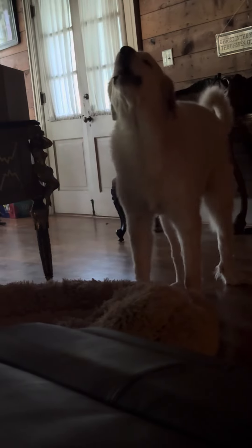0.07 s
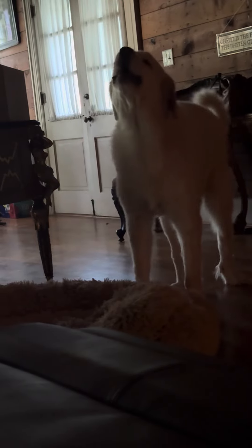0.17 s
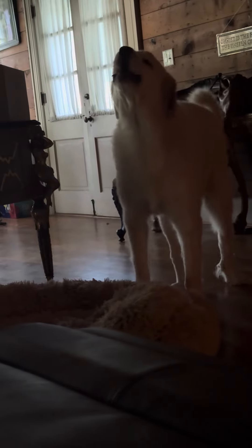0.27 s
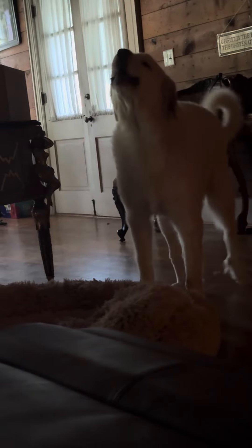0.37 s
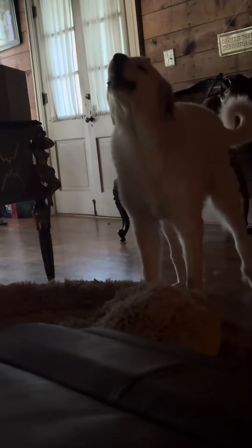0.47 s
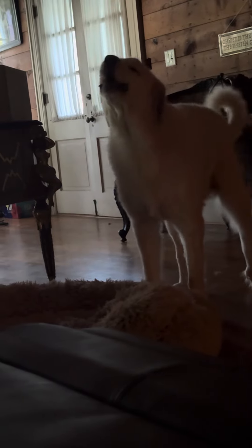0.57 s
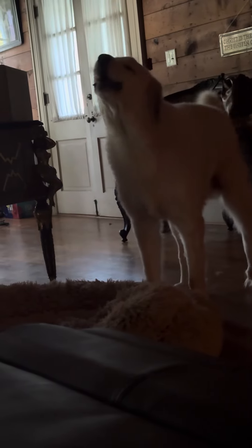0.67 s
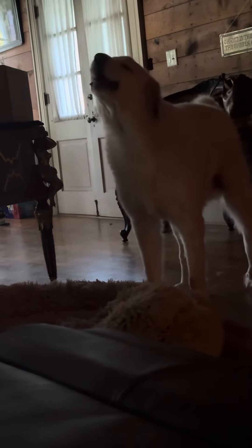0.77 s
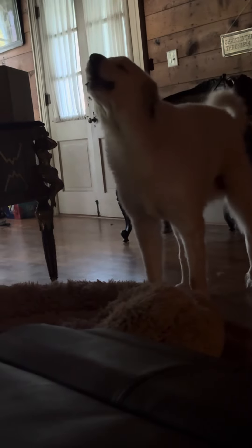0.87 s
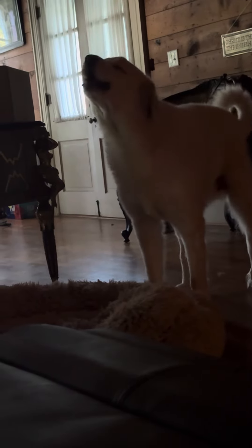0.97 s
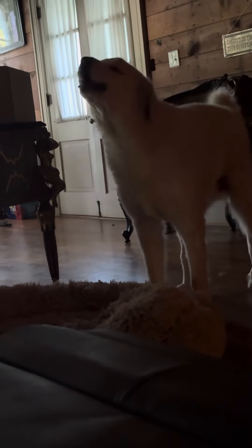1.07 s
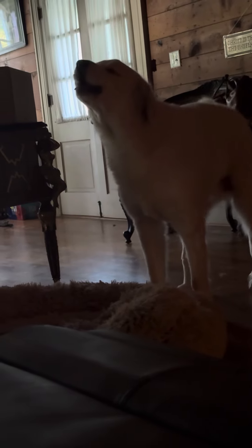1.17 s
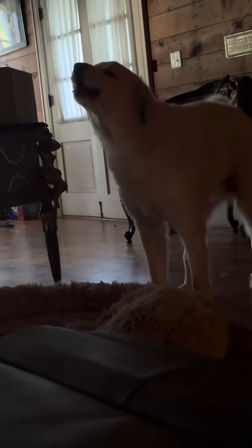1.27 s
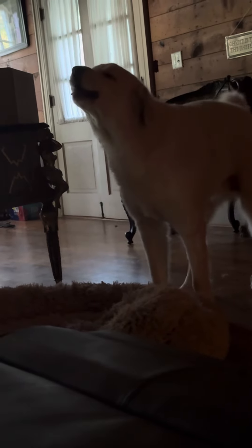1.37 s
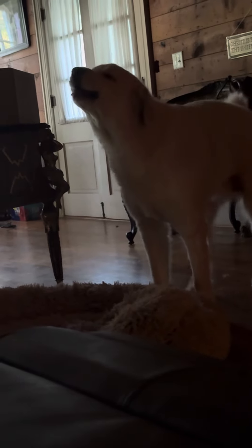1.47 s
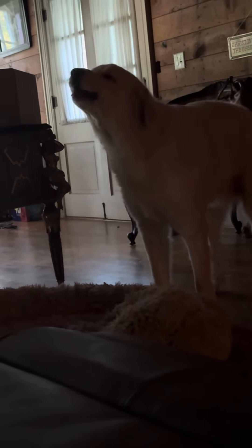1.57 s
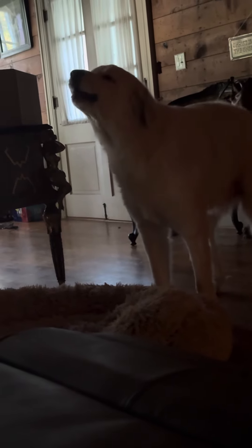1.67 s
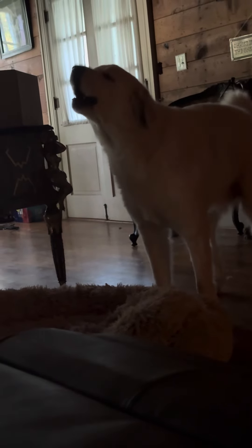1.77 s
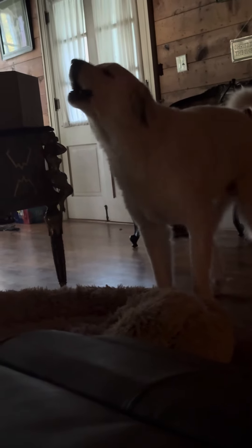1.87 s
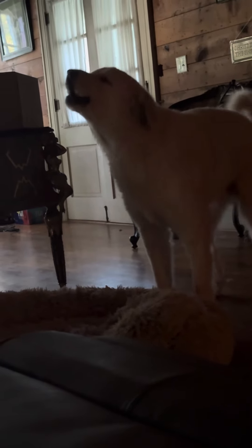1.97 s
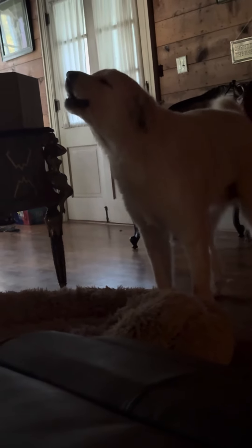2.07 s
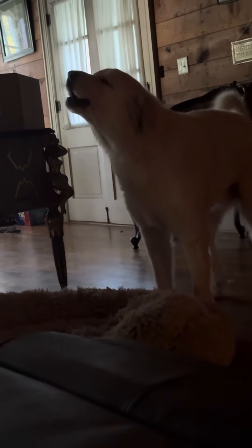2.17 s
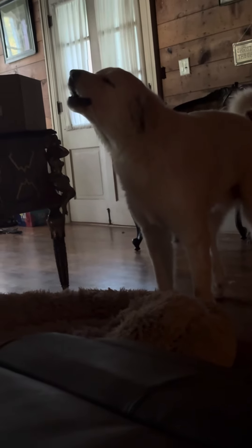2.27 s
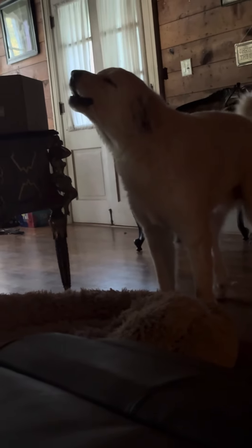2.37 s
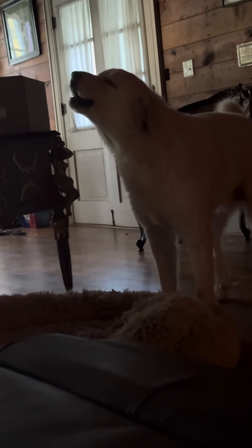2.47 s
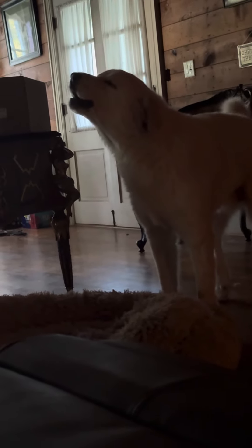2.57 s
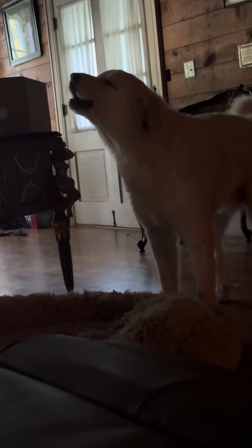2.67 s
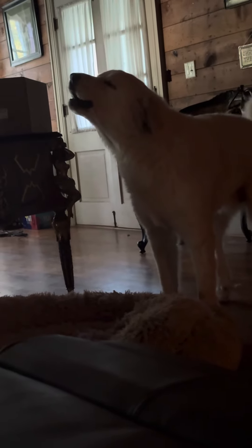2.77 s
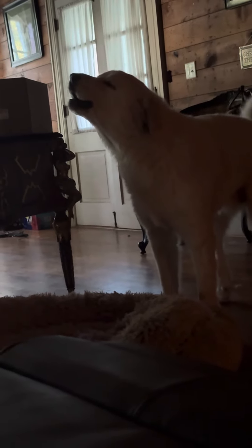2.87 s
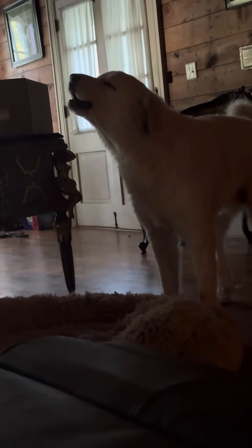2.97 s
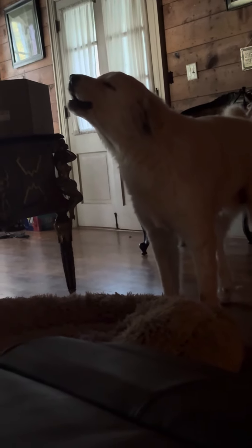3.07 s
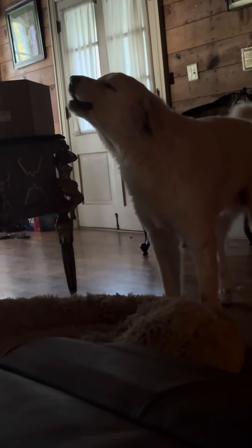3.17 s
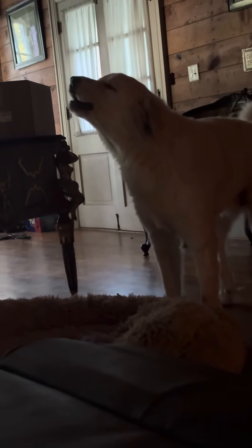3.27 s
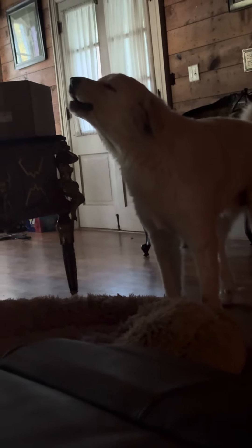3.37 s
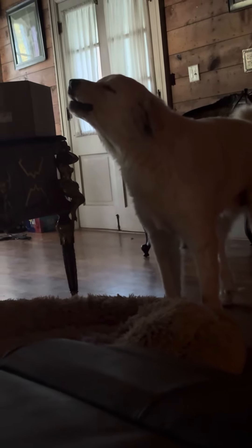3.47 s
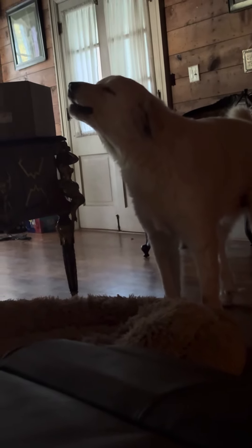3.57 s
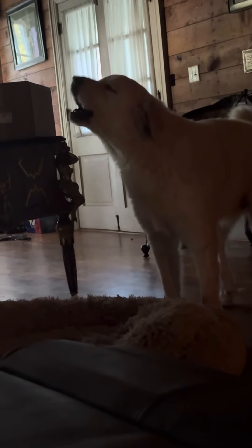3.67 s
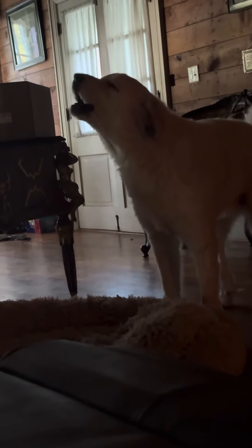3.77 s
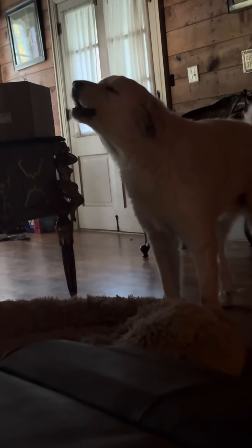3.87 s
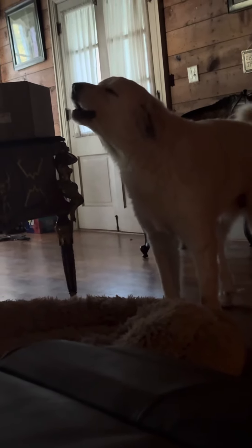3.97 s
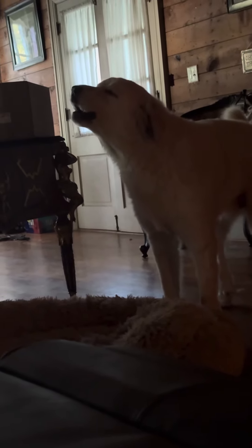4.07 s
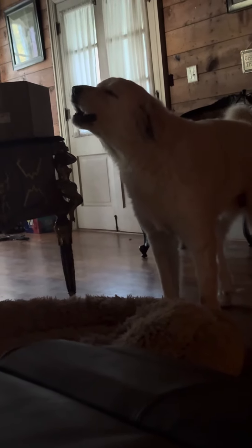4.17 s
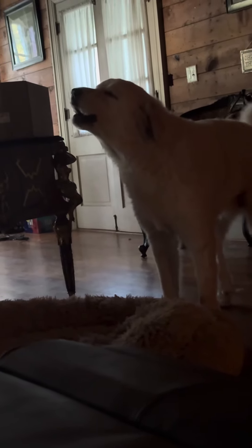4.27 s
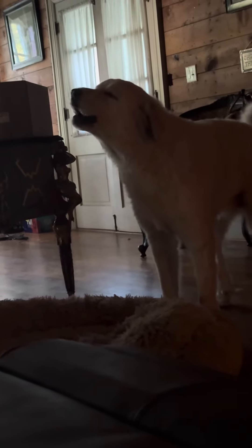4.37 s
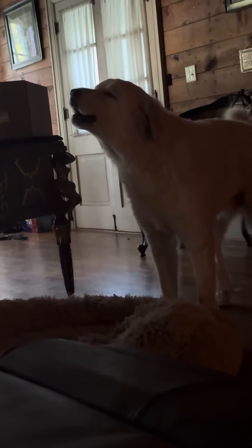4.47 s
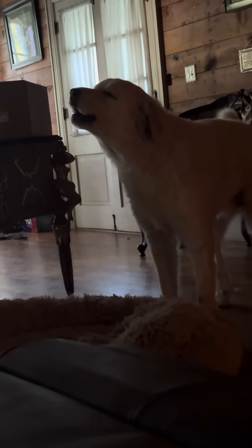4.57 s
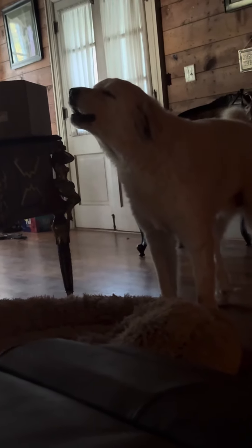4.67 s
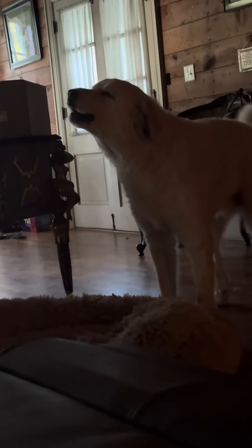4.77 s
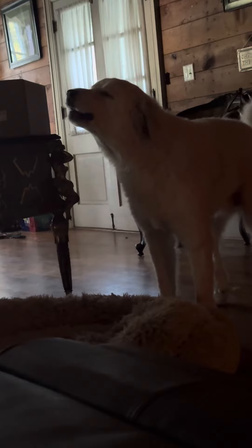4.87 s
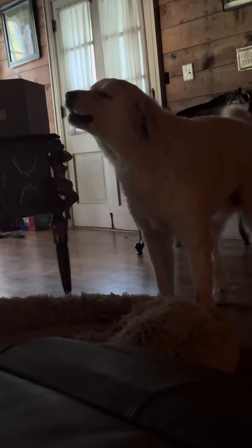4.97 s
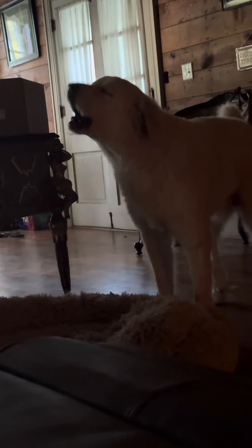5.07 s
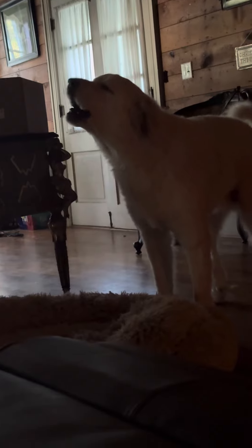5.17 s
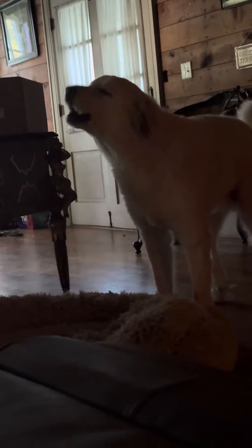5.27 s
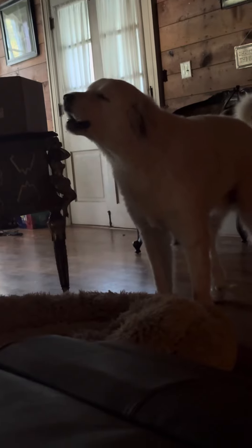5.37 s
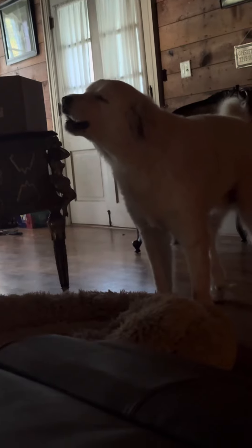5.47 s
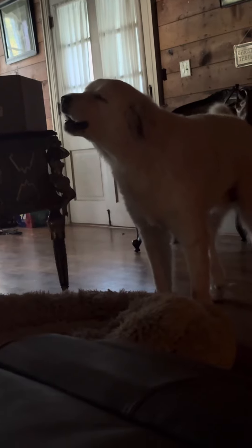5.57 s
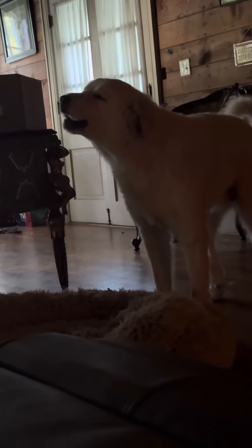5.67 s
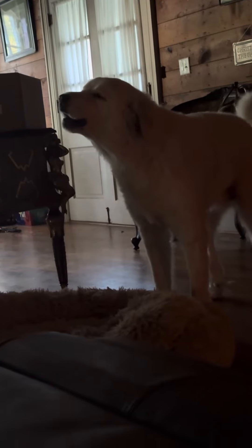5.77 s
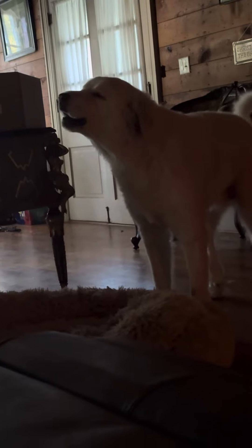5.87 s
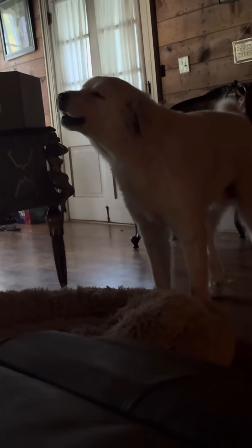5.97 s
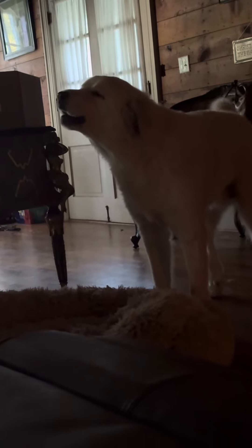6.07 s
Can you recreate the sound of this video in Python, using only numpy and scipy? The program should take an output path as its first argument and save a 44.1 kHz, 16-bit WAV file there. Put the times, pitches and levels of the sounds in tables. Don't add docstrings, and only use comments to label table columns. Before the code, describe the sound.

A large dog howls in a wood-panelled living room, heard by a phone a few metres away. At 0 s a high yelp already under way drops to a short low note, then at 0.1 s leaps to a long high howl, wavering and gradually sinking until it falls off near 1.45 s. Small dry claw ticks land on the boards at about 1.6 s. The second howl starts high at 1.8 s, drops low at 1.9, flips up at 2.45 and holds until a quick fall at 3.4. The third opens higher at 3.65, dips at 3.8, rises at 4.1 and ends low by 4.9. The fourth starts highest at 5.1, holds low from 5.2, then flips up just before 6 s and is cut off. The tone is smooth and nearly pure, briefly rough at the breaks. A short room ring, faint low hum and soft hiss lie beneath.

```python
import sys
import numpy as np
from scipy import signal
from scipy.fft import rfft, irfft
from scipy.io import wavfile
from scipy.ndimage import uniform_filter1d

SR = 44100
rng = np.random.default_rng(int(sys.argv[2]) if len(sys.argv) > 2 else 0)


def store_wav(level_fs):
    pcm = np.round(np.clip(np.atleast_2d(level_fs), -1, 1) * 32767)
    wavfile.write(sys.argv[1], SR, pcm.T.astype(np.int16))


def magnitude_from_level(level_db):
    exponent = np.asarray(level_db, float) / 20
    return 10 ** exponent


N = 269451
LEAD = 8000


def at_hz(points, hz):
    table_hz, values = np.transpose(points)
    return np.interp(np.log(hz), np.log(table_hz), values)


def drift(size, rate):
    knots = rng.standard_normal(400)
    return np.interp(np.arange(size) * rate / SR, np.arange(400), knots)


def coloured(spectrum, size):
    hz = np.maximum(np.arange(size // 2 + 1) * SR / size, 1)
    noise = irfft(rfft(rng.standard_normal(size)) * magnitude_from_level(at_hz(spectrum, hz)), size)
    return noise / np.std(noise)


def hum():
    # (frequency [Hz], level [dB per Hz])
    hum_spectrum = [(15, -44), (25, -7.5), (59, 1.5), (113, 5), (206, -9.5), (227, -9), (240, -0.5),
                    (310, -36.5), (530, -120)]
    mid = magnitude_from_level(-60) * coloured(hum_spectrum, size=N)
    side = magnitude_from_level(-83) * coloured(hum_spectrum, size=N)
    return np.array([mid, side])


def air():
    # (frequency [Hz], level [dB per Hz])
    air_spectrum = [(140, -21.5), (240, -16), (563, -6), (1360, -24.5), (1730, -7), (2160, -38.5),
                    (2630, -19.5), (8570, -26.5), (11100, -76.5), (18900, -120)]
    mid = magnitude_from_level(-73) * coloured(air_spectrum, size=N)
    side = magnitude_from_level(-84) * coloured(air_spectrum, size=N)
    return np.array([mid, side])


def room(x):
    # (frequency [Hz], time to fall 60 dB [s])
    decay_times = [(200, 0.53), (500, 0.47), (1500, 0.52), (4000, .35), (9000, 0.27)]
    t = np.arange(SR) / SR
    tail = np.zeros(SR)
    edges = 120 * 2 ** np.arange(0, 7.1, 0.5)
    for low, high in zip(edges, edges[1:]):
        band_filter = signal.butter(2, [low, high], "band", fs=SR, output="sos")
        band = signal.sosfilt(band_filter, rng.standard_normal(SR))
        tail += band * magnitude_from_level(-60 * t / at_hz(decay_times, np.sqrt(low * high)))
    tail *= np.clip((t - 0.006) / 0.012, 0, 1)
    tail /= np.sqrt(np.sum(tail ** 2))
    return signal.fftconvolve(x, tail)[:len(x)]


def port_difference(mid):
    # (frequency [Hz], level [dB per Hz])
    spectrum = [(5000, -31.5), (7000, -9.5), (9000, -10), (15000, 0), (16000, -47.5)]
    treble = np.diff(mid, 3, prepend=[0, 0, 0])
    loudness = uniform_filter1d(np.abs(treble), size=900)
    return 1.5 * loudness * coloured(spectrum, size=N)


def claws():
    # (time [s], peak level [dB])
    ticks = [
        (1.5638, -61),
        (1.5779, -42.5),
        (1.6055, -38),
        (1.657, -37.5),
    ]
    clicks = np.zeros(N + LEAD)
    for s, db in ticks:
        burst = rng.standard_normal(200) * np.exp(-np.arange(200) / 32.0)
        start = LEAD + round(s * SR)
        clicks[start:start + 200] += magnitude_from_level(db - 1) * burst
    return signal.sosfilt(signal.butter(2, [500, 8500], "band", fs=SR, output="sos"), clicks)


def note(rows):
    # (frequency [Hz], level [dB])
    throat = [(1400, 19.5), (2000, 3), (2700, -1), (3200, -32), (3800, -1.5), (4400, 0), (5400, -6),
              (6000, -16), (6800, -11), (8000, -31), (10000, -33), (12000, -62)]
    # (frequency [Hz], level [dB])
    thirds = [(150, -42.5), (400, -2), (700, -6), (950, -3.5), (1300, -26), (1550, -6), (1950, -17.5),
              (2400, -38), (3200, -42), (4300, -15.5), (7000, -40.5), (9000, -29.5)]
    s, *columns = np.transpose(rows)
    t = np.arange(s[0], s[-1], 1 / SR)
    hz, first_db, second_db, third_db, upper_db, thirds_db = [np.interp(t, s, c) for c in columns]
    hz = uniform_filter1d(hz, size=1300) * (1 + 0.0035 * drift(len(t), 45.0))
    phase = 2 * np.pi * np.cumsum(hz) / SR
    voice = np.zeros(len(t))
    for k, db in enumerate([first_db, second_db, third_db], 1):
        voice += magnitude_from_level(db) * np.sin(k * phase + k * k)

    coarse = slice(None, None, 64)
    for n in range(1, 60):
        if n in (3, 6, 9):
            continue
        if n % 3:
            colour, level_db = thirds, thirds_db
        else:
            colour, level_db = throat, upper_db - 11.5
        line_db = level_db[coarse] + at_hz(colour, n / 3 * hz[coarse])
        line_db = line_db + 4.56 * drift(len(t), 14.42)[coarse]
        level = np.repeat(magnitude_from_level(line_db), 64)[:len(t)]
        voice += level * np.sin(n / 3 * phase + n * n)

    breath = coloured([(700, -42.5)] + throat, size=len(t)) * (1 + 0.92 * np.sin(phase))
    out = np.sqrt(2) * voice + magnitude_from_level(upper_db - 17.5) * breath
    fade = np.clip(np.minimum(t - s[0], s[-1] - t) / 0.0051, 0, 1)
    return out * fade


def dog():
    # (time [s], pitch [Hz], fundamental [dB], 2nd partial [dB], 3rd partial [dB],
    # upper partials [dB], third-pitch lines [dB])
    high_notes = [
        [(0.095, 556, -15, -41.5, -64.5, -64.5, -40), (0.119, 552.2, -14, -47, -61.5, -40.5, -48.5),
         (0.161, 555.8, -18, -36, -44, -46, -53), (0.213, 523.3, -20.5, -46.5, -40.5, -40, -46),
         (0.289, 516.3, -17, -55.5, -29, -49.5, -68), (0.331, 542.5, -23.5, -41.5, -52.5, -41.5, -55),
         (0.375, 546.8, -15.5, -53, -49, -45, -62), (0.493, 540.5, -39, -40.5, -50.5, -44.5, -66.5),
         (0.521, 550, -10.5, -49.5, -48, -49, -57.5), (0.581, 546, -19, -44, -46.5, -43, -62.5),
         (0.773, 548.2, -22.5, -44.5, -55.5, -49.5, -62.5), (0.827, 530.3, -21, -41.5, -46.5, -42.5, -68),
         (0.953, 534.2, -26.5, -43, -50, -49.5, -68), (1.119, 511.7, -19.5, -46.5, -37.5, -46, -68),
         (1.227, 514.8, -22, -44.5, -49, -55, -61), (1.293, 511.8, -20.5, -46, -37.5, -49.5, -60),
         (1.381, 497.1, -24.5, -41.5, -49, -60, -57.5), (1.42, 485.7, -25.5, -51, -60, -58, -46.5)],
        [(1.76, 536, -38.5, -56.5, -59.5, -64, -43), (1.77, 545, -28, -34.5, -50, -73.5, -45),
         (1.802, 599, -18.5, -21.5, -33, -48.5, -39.5), (1.846, 600.9, -14, -34.5, -25.5, -36, -37.5),
         (1.87, 592, -18, -29.5, -55, -51, -35.5)],
        [(2.447, 493, -40, -79.5, -74, -54, -45.5), (2.459, 541.4, -23.5, -44, -75, -46.5, -39),
         (2.499, 550.2, -15, -34.5, -44.5, -50, -41), (2.539, 535.2, -20.5, -58.5, -58.5, -46.5, -58.5),
         (2.585, 544, -27, -43, -60.5, -46, -57), (2.877, 547.6, -23.5, -41, -56.5, -49, -68),
         (2.917, 543.8, -27.5, -50, -63.5, -50, -64), (2.989, 542.8, -31.5, -39, -62, -44.5, -68),
         (3.045, 547.7, -18, -45, -56.5, -56.5, -62), (3.077, 553.5, -19, -41.5, -60, -44.5, -62.5),
         (3.207, 528.8, -30.5, -42.5, -36.5, -57, -67.5), (3.285, 534.2, -16.5, -41.5, -55, -48, -68),
         (3.351, 523.8, -26, -47.5, -37, -54, -50), (3.395, 490.3, -24, -46.5, -53.5, -63.5, -53)],
        [(3.645, 609, -29, -67.5, -80, -88, -46.5), (3.661, 619.5, -27, -32.5, -37.5, -69.5, -55),
         (3.689, 623.3, -17.5, -25.5, -40, -48.5, -39.5), (3.725, 612.7, -20, -37, -24.5, -61, -40.5),
         (3.77, 593, -15, -39, -55, -58.5, -32.5)],
        [(4.105, 563.4, -18.5, -45, -55, -61, -36), (4.147, 573.8, -18.5, -34.5, -47, -70, -32),
         (4.261, 548.1, -18.5, -44, -52.5, -54, -48), (4.371, 583.5, -17.5, -36, -39, -38, -54),
         (4.451, 535.2, -26, -41.5, -57, -53.5, -59.5), (4.479, 515.4, -29, -38, -49.5, -53, -53.5),
         (4.565, 567.7, -18, -39.5, -44.5, -42.5, -64), (4.627, 568.3, -14, -38.5, -43.5, -41, -50.5),
         (4.689, 553.7, -29, -44.5, -71, -47.5, -54.5), (4.701, 491.5, -27, -34, -36, -55.5, -54.5),
         (4.745, 488.5, -20, -51.5, -56.5, -58.5, -40)],
        [(5.06, 647, -53.5, -81.5, -70.5, -92, -50.5), (5.08, 649, -26.5, -34.5, -42, -56, -47),
         (5.148, 650, -14.5, -28.5, -26, -39.5, -50), (5.186, 558.3, -25, -29, -38.5, -53, -47),
         (5.21, 477.6, -21, -32, -43, -56.5, -47)],
        [(5.975, 681, -49.5, -75, -64, -69, -45.5), (5.991, 556, -22.5, -45.5, -48, -54.5, -37.5),
         (6.027, 578, -18.5, -38.5, -40, -46.5, -37.5), (6.085, 547.4, -19, -44, -61, -50.5, -44),
         (6.11, 572, -44, -52.5, -43, -50.5, -57)],
    ]
    low_notes = [
        [(0.0, 426.7, -16, -53, -56, -54.5, -69), (0.024, 425.3, -15, -36.5, -52.5, -60.5, -67.5),
         (0.052, 407.4, -38.5, -46.5, -61.5, -66, -56.5), (0.07, 408, -23.5, -28, -65, -55, -57),
         (0.095, 379, -31.5, -44.5, -38, -49.5, -50)],
        [(1.87, 438.7, -22, -38, -45, -47, -77), (1.89, 436.3, -20, -49.5, -55.5, -51.5, -63.5),
         (1.92, 399.6, -30.5, -34, -38, -47, -79), (1.956, 428, -34, -70.5, -55.5, -60, -56),
         (1.988, 377, -25.5, -31, -50.5, -62, -48), (2.058, 369.7, -17.5, -41.5, -40.5, -56.5, -65),
         (2.158, 354.5, -22.5, -35, -46, -62.5, -55.5), (2.276, 365.6, -13, -30.5, -45.5, -56.5, -68.5),
         (2.386, 362.8, -16.5, -50, -42, -65, -54.5), (2.447, 366, -34.5, -23.5, -64, -50, -65.5)],
        [(3.77, 416, -28, -49.5, -37, -50, -47), (3.862, 381.2, -27, -34.5, -49.5, -62.5, -57.5),
         (3.906, 377.5, -28.5, -30.5, -47.5, -55.5, -56.5), (3.964, 363.6, -18.5, -40, -38.5, -65, -65.5),
         (3.992, 357, -16, -49, -60, -58, -67.5), (4.046, 356.3, -25, -31, -44.5, -64.5, -66),
         (4.105, 365, -28.5, -30, -53.5, -50, -61)],
        [(4.745, 370.5, -39, -54, -51, -69, -67.5), (4.775, 366, -23.5, -30.5, -55.5, -62.5, -58),
         (4.797, 370, -33, -66, -60, -64, -58.5), (4.827, 364.2, -43.5, -52.5, -48, -77.5, -47.5),
         (4.87, 347.7, -34, -37, -67, -68, -47.5)],
        [(5.21, 402.4, -31, -35.5, -58.5, -50.5, -47), (5.256, 385.9, -43, -42.5, -39.5, -55, -62.5),
         (5.398, 364.2, -15.5, -35, -41.5, -54.5, -80.5), (5.418, 356.1, -16.5, -43, -51, -58, -69),
         (5.478, 349.3, -31.5, -34, -51.5, -61, -68), (5.538, 359.4, -18, -29.5, -43, -58, -66),
         (5.638, 364.1, -13.5, -29, -42, -55, -80.5), (5.666, 353.2, -31, -53.5, -51, -61.5, -73.5),
         (5.762, 355.3, -16.5, -29, -44, -63.5, -66.5), (5.784, 373.3, -20.5, -34, -43, -50, -56.5),
         (5.946, 343.4, -30, -31.5, -47.5, -64, -72), (5.975, 355.3, -27.5, -55, -42, -49.5, -67)],
    ]
    end_notes = [
        [(-.15, 597.3, -9.5, -37, -45.5, -59, -41), (-.02, 598.2, -16, -36, -39.5, -56.5, -30),
         (0, 561, -26, -20, -26, -48.5, -17)],
        [(1.42, 433.6, -24, -49.5, -66, -70.5, -49.5), (1.44, 319, -37, -47.5, -46, -77.5, -58.5),
         (1.47, 287.5, -34.5, -57.5, -49, -63, -79)],
        [(3.395, 428, -30.5, -42.5, -52, -61, -56), (3.41, 319, -41.5, -48.5, -47.5, -61.5, -58),
         (3.45, 299, -29.5, -53, -42.5, -78, -67)],
    ]
    out = np.zeros(N + 2 * LEAD)
    for rows in high_notes + low_notes + end_notes:
        sound = note(rows)
        start = LEAD + round(rows[0][0] * SR)
        out[start:start + len(sound)] += sound
    return out[:N + LEAD]


def scene():
    close = dog() + claws()
    mid = (close + magnitude_from_level(-7) * room(close))[LEAD:]
    side = magnitude_from_level(-18.5) * room(close)[LEAD:] + 0.04 * mid
    mid, side = np.array([mid, side]) + hum() + air()
    side = side + port_difference(mid)
    return np.array([mid + side, mid - side])


def roll_off(x):
    return signal.sosfilt(signal.butter(12, 8720, fs=SR, output="sos"), x)


def record(dry):
    return roll_off(dry)


dry = scene()
out = record(dry)
store_wav(out)
```